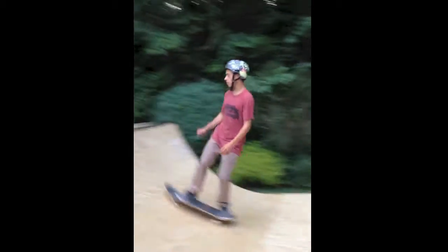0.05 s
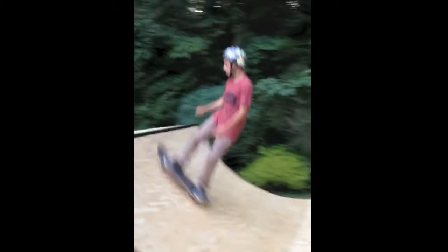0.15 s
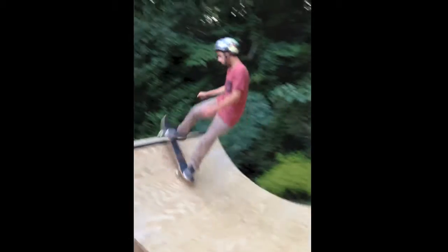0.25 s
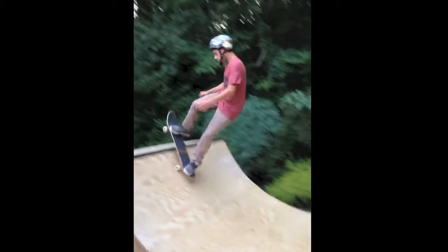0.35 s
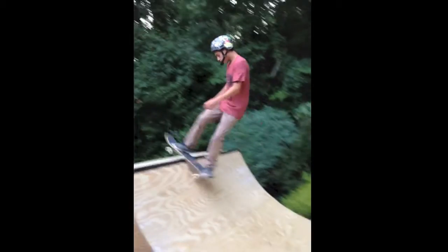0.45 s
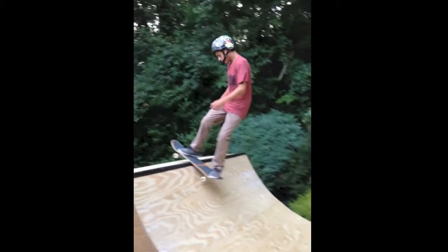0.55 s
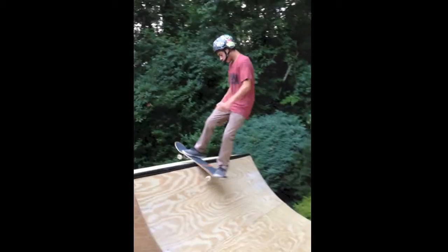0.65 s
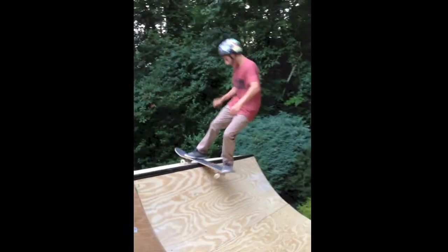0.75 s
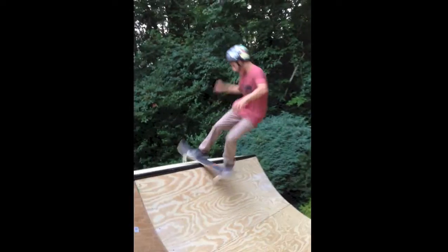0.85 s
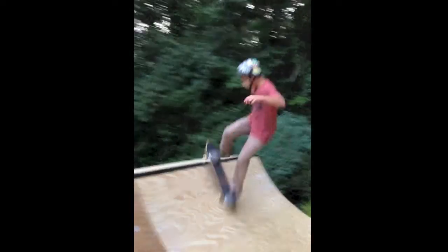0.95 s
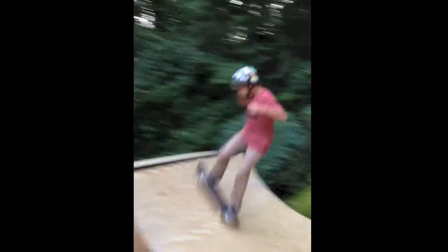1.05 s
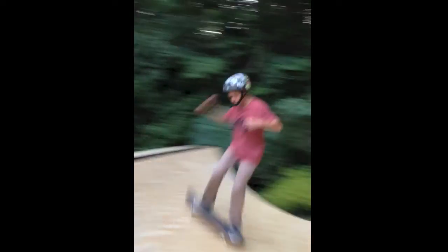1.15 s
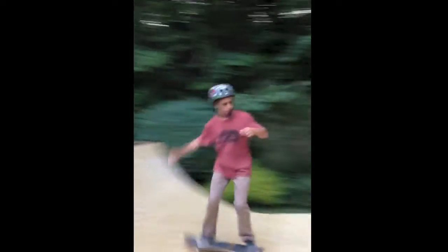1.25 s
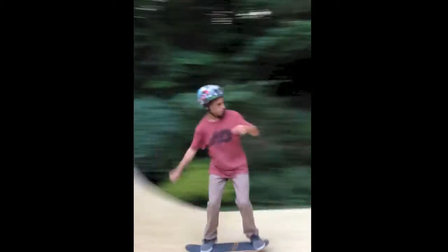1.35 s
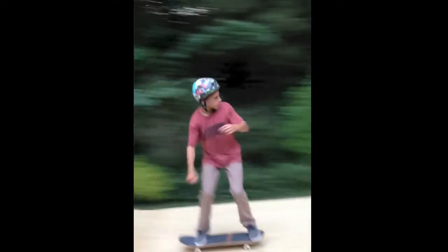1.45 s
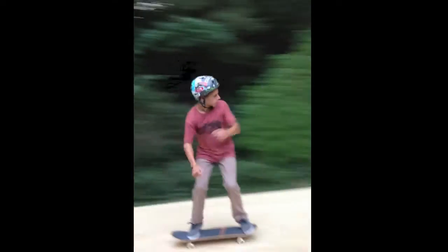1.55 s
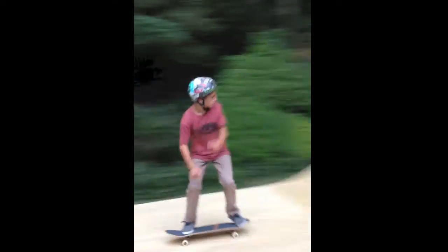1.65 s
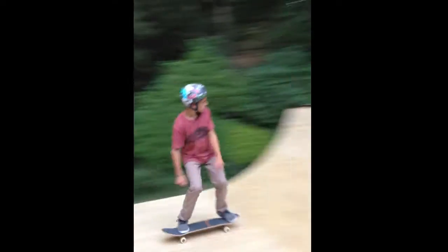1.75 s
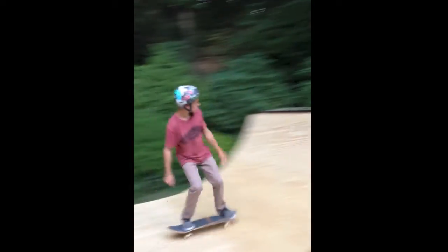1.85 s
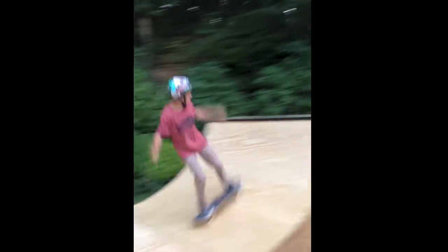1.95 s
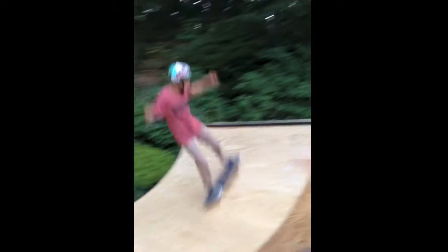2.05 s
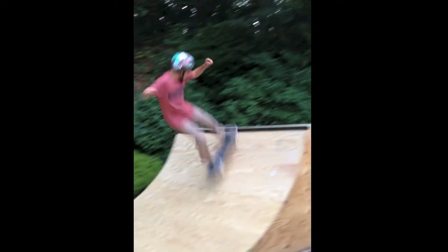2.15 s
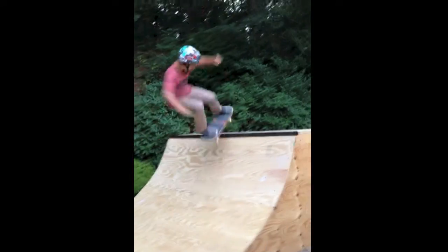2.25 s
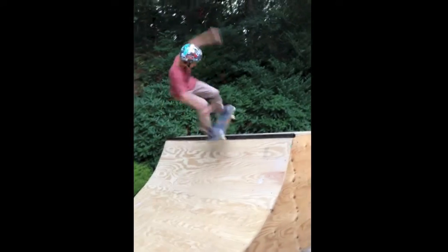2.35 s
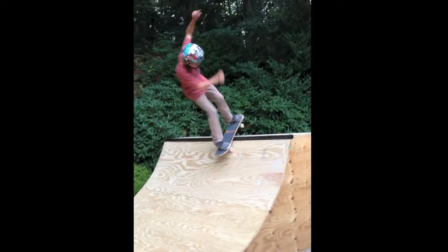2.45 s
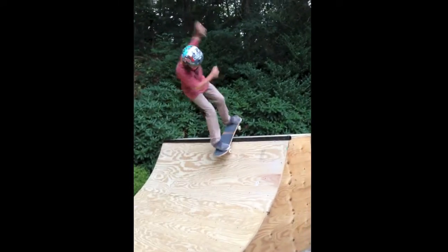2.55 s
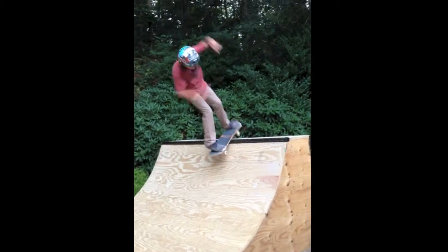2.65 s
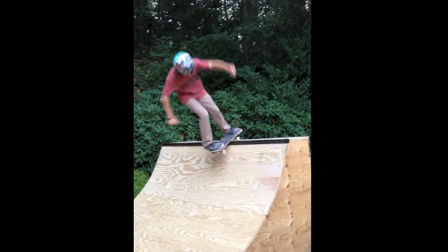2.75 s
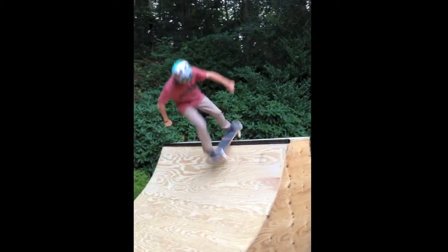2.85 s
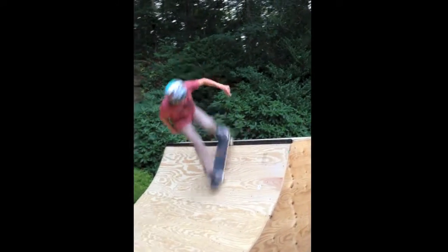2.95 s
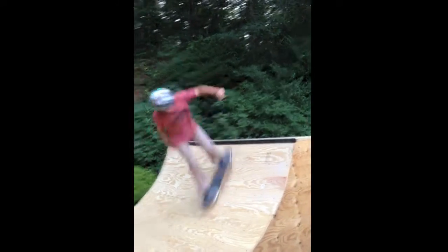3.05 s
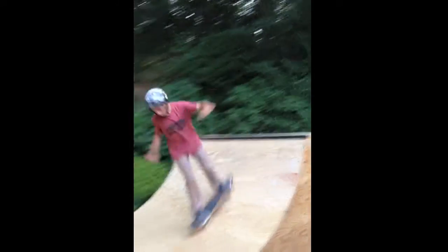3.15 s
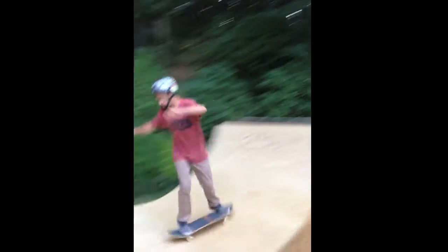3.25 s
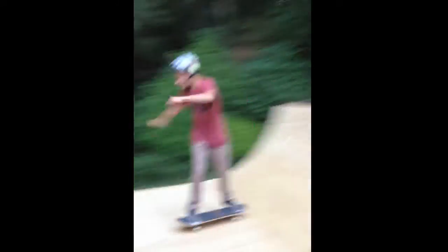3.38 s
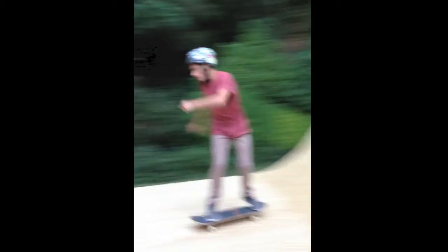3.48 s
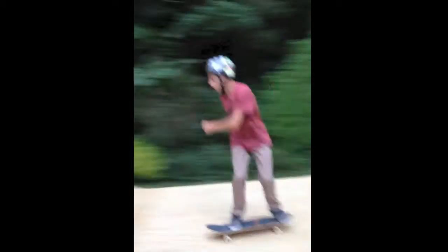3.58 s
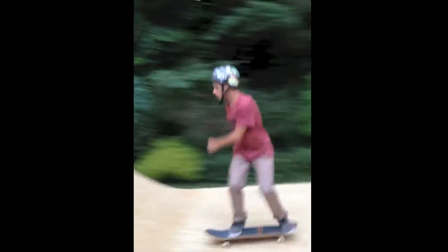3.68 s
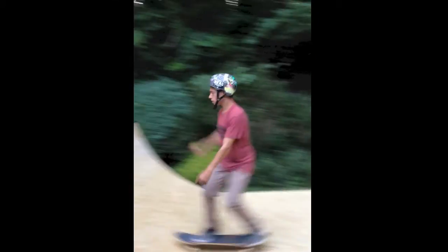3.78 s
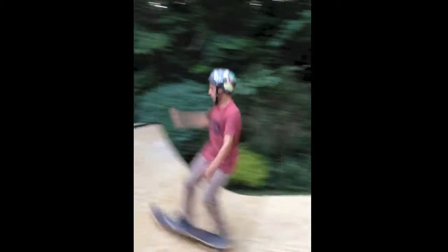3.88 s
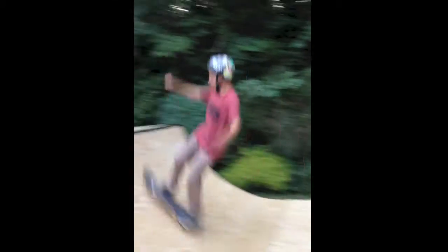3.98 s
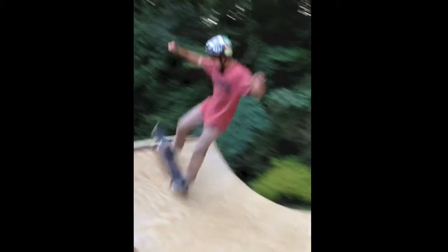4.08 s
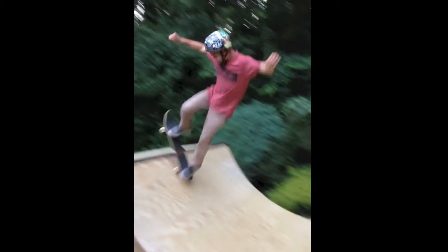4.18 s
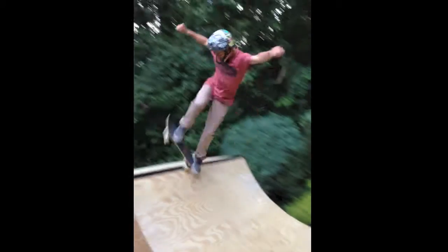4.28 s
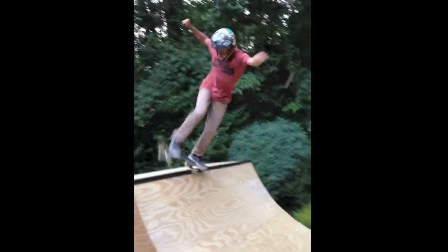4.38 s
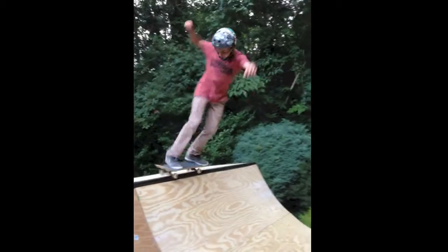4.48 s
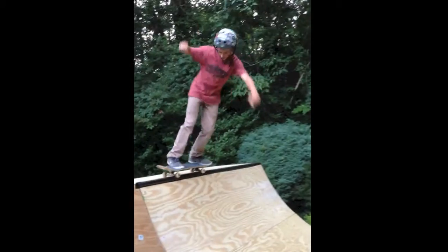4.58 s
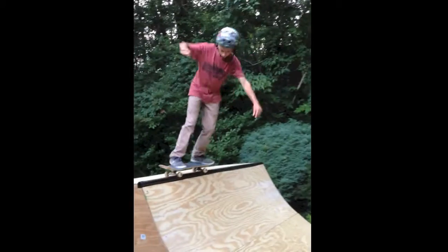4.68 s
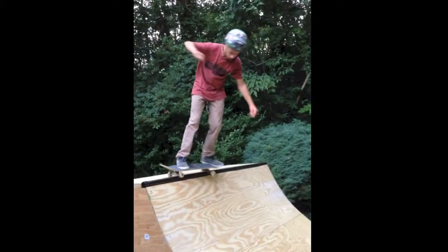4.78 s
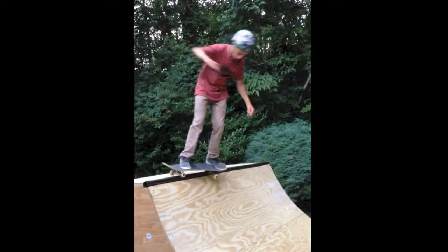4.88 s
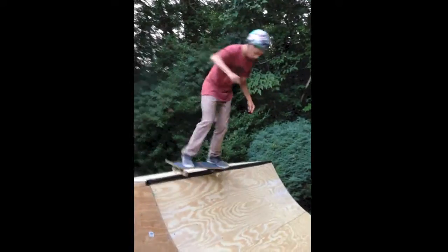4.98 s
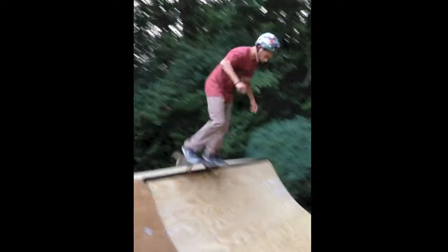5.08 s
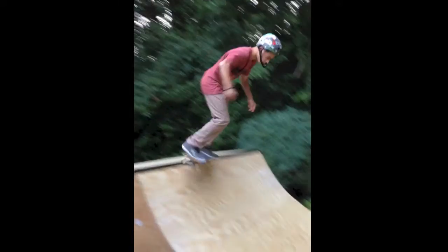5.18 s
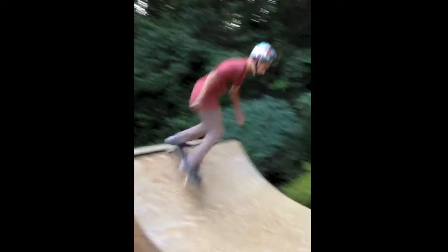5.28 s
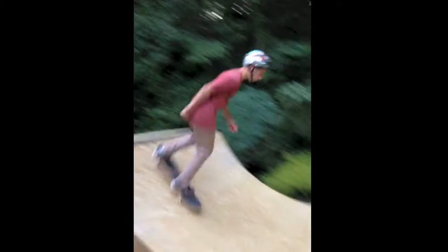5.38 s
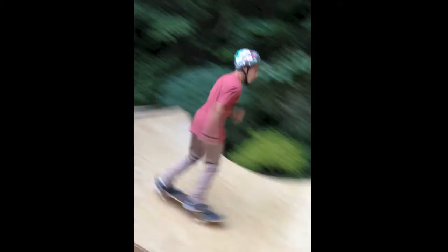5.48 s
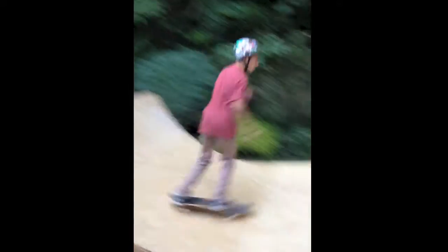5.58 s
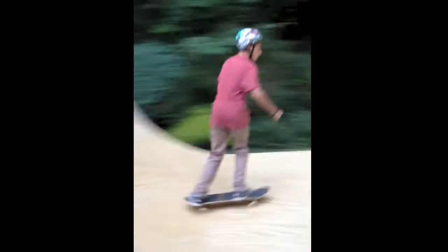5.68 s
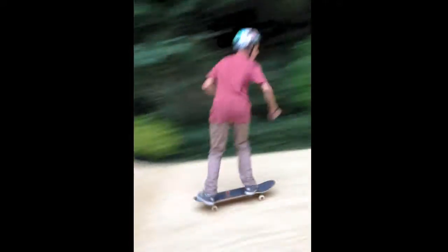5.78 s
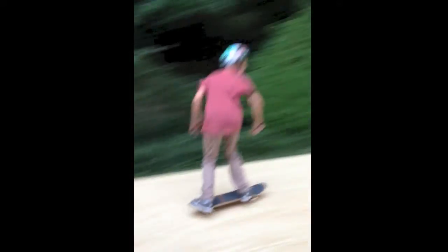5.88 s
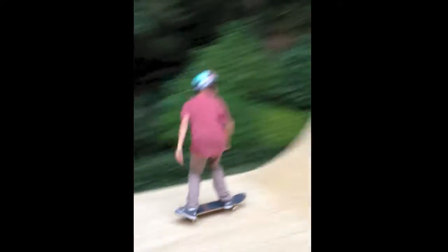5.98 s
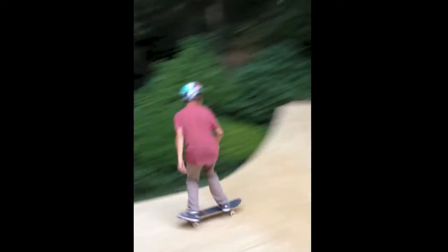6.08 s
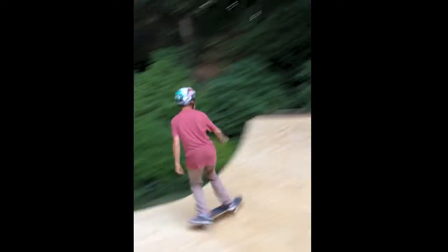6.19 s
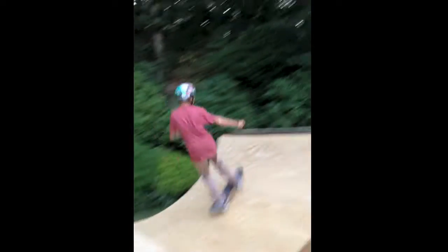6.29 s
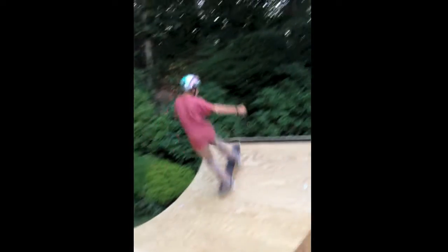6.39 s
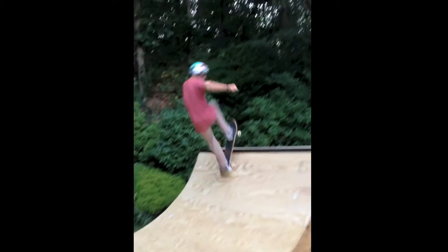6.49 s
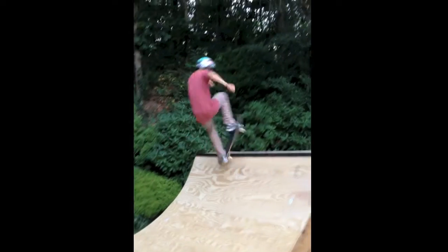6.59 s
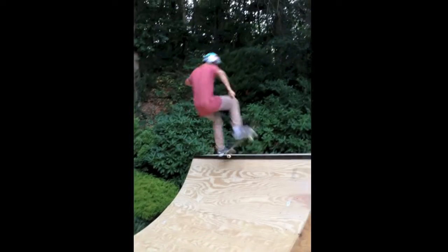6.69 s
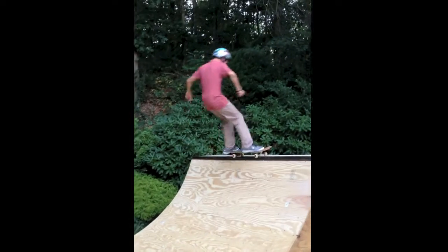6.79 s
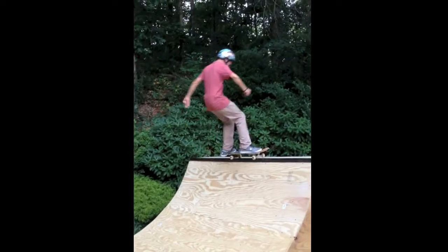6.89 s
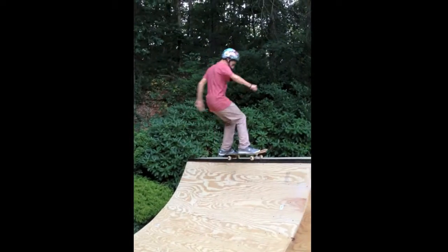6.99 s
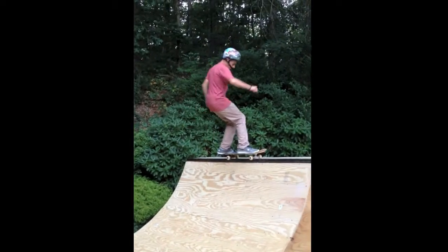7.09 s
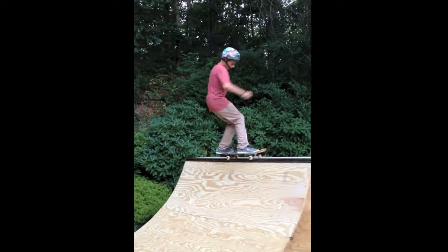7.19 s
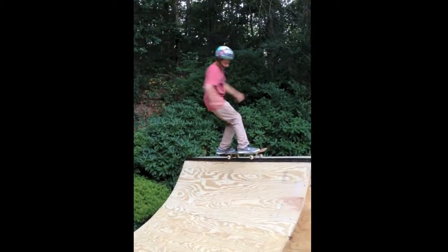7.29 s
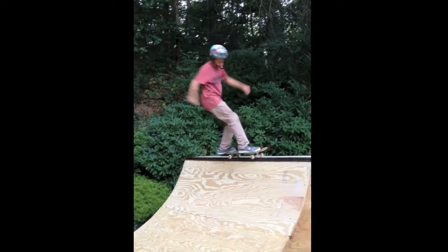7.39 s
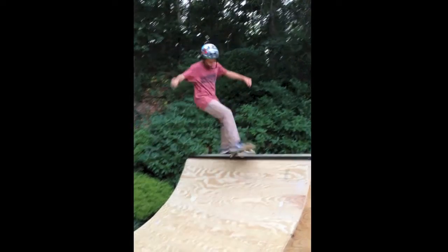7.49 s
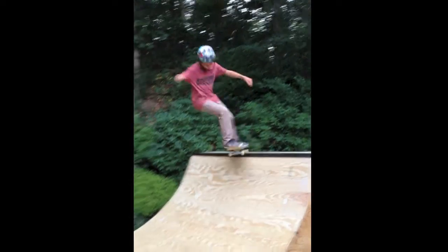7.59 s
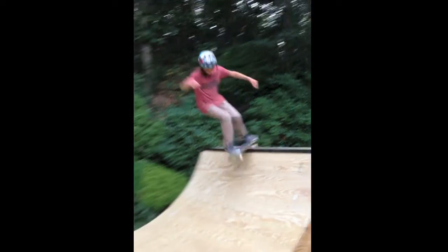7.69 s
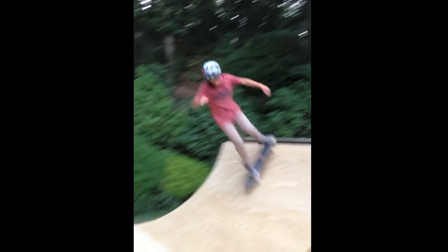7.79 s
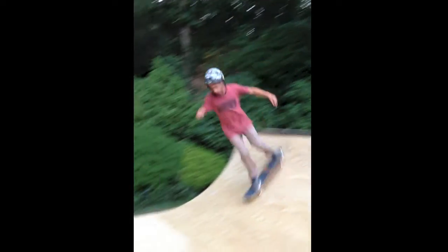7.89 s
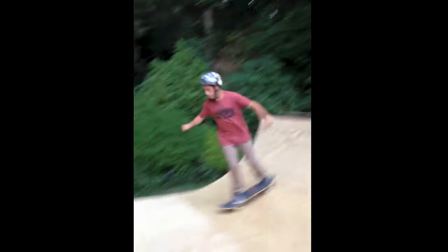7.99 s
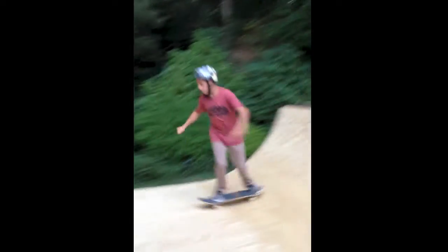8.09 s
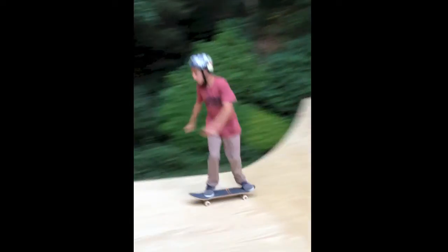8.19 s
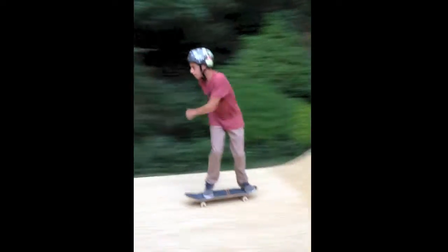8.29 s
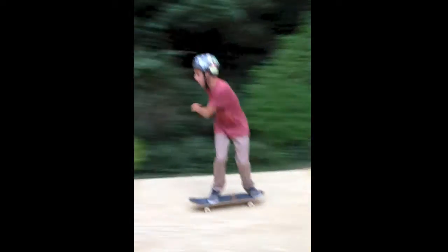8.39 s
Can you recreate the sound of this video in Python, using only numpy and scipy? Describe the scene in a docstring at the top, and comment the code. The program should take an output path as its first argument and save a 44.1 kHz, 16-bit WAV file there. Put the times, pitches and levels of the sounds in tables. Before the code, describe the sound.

A skateboard rolls up a hollow plywood ramp with rumble, roar and hiss, then cracks against the lip and nearly goes silent. It knocks back in, rumbles across the flat and climbs again. Four lip visits follow this pattern, the later two with metallic clanks on steel coping. Quiet backyard air, faint slap echoes, close small microphone with thin deep bass.

```python
"""Skateboard on a wooden mini ramp

A skateboarder rides back and forth on a plywood mini ramp in a quiet backyard. Filtered random bumps
make the hollow ramp rumble, roar and hiss, loudest in the curves. At each lip, short noisy contacts
knock modal deck and ramp resonances or clank the steel coping; the board stalls in near silence and
drops back in. Skids chirp, bearings whirr on the flat, and scattered echoes answer from the yard."""
import sys
import numpy as np
from scipy import signal
from scipy.fft import rfft, irfft
from scipy.io import wavfile

SR = 44100
rng = np.random.default_rng(int(sys.argv[2]) if len(sys.argv) > 2 else 0)


def waveform_to_disk(signal):
    """Save audio, clipped to [-1, 1], as 16-bit WAV at the path in sys.argv[1]."""
    frames = np.transpose(np.atleast_2d(signal))
    scaled = np.clip(frames, -1, 1) * 32767
    samples = np.round(scaled).astype(np.int16)
    wavfile.write(sys.argv[1], SR, samples)


N = 372204

# riding down a curved wall: (start [s], end [s], level [dB], extra rumble [dB])
DESCENT_ROWS = [(1.114, 1.398, 2, 0.5), (3.111, 3.39, 2.5, -0.5), (5.45, 5.74, 1, -0.5),
                (7.87, 8.202, -2, -2)]
# riding up the opposite wall: (start [s], end [s], level [dB], extra rumble [dB])
CLIMB_ROWS = [(0.0, 0.281, 0, -1.5), (1.891, 2.219, 0.5, -2), (3.846, 4.151, 1.5, 2),
              (6.222, 6.513, -2.5, 0.5)]
# crossing the flat bottom: (start [s], end [s], level [dB], extra rumble [dB])
FLAT_ROWS = [(1.405, 1.913, -2.5, 4.5), (3.418, 3.854, 0.5, 1), (5.744, 6.28, 0.5, -0.5),
             (8.222, 8.453, -1.5, -2)]
# trucks striking the steel coping: (time [s], blow level [dB], deck note [Hz], ring level [dB],
# ring length [factor], strength of the clear modes [factor])
CLANK_ROWS = [(4.400, -30, 435, -41, 1, .3), (4.531, -20, 812, -26.5, 0.77, 0.56),
              (6.7898, -21, 915, -26.5, 0.78, .15), (6.842, -25, 548, -42, 0.34, .15),
              (6.8596, -21, 483, -26.5, 0.82, .2), (6.986, -35, 447, -40, 0.74, .2)]
# stiff modes of deck and trucks: (frequency [Hz], level [dB], t60 [s])
CLACK_MODES = [(1556, -2.5, 0.069), (2043, -2, 0.029), (2445, -11, 0.065), (3360, -16, 0.056),
               (3780, -3, 0.018), (4570, -14, 0.071), (5150, -12.5, 0.024)]
# spectrum of the topmost tick of a contact: (frequency [Hz], density [dB per Hz])
TICK_SPECTRUM = [(3500, -39), (6000, -3), (7000, -1), (9000, -1.5), (11500, -5), (13000, -13), (16000, 1)]


def gain_of(db):
    """Decibels to amplitude."""
    return 10 ** (np.asarray(db) / 20)


def evened(x):
    """Scales to rms 1."""
    return x / np.sqrt(np.mean(x ** 2) + 1e-20)


def struck(x, seconds):
    """Scales a blow to rms 1 over its first moments."""
    return x / np.sqrt(np.mean(x[:int(seconds * SR)] ** 2) + 1e-20)


def read(points, hz):
    """Reads a table on a log-frequency axis."""
    f, value = np.transpose(points)
    return np.interp(np.log(hz + 1), np.log(f + 1), value)


def add(mix, start_s, sound):
    """Mixes a sound in at a start time."""
    part = mix[max(0, round(start_s * SR)):][:len(sound)]
    part += sound[:len(part)]


def colour(points, size=4096):
    """Causal (minimum-phase) impulse response with the given spectrum."""
    log_gain = np.log(gain_of(read(points, abs(np.fft.fftfreq(size, 1 / SR)))))
    spectrum = np.exp(np.conj(signal.hilbert(log_gain)))
    return np.fft.ifft(spectrum).real[:size // 2]


def through(x, response):
    """Passes x through an impulse response."""
    return signal.oaconvolve(x, response)[:len(x)]


def wander(rate_hz):
    """Smooth random curve of rms 1, up to about the given rate."""
    f = np.fft.rfftfreq(N, 1 / SR)
    return evened(irfft(rfft(rng.standard_normal(N)) / (1 + (f / rate_hz) ** 4), N))


def ring(modes, t, spread_db=2., detune=.02):
    """Decaying sine modes; strengths and pitches vary as with the place that is struck."""
    hz, db, t60 = np.transpose(modes)[:, :, None]
    strength, shift, side = rng.standard_normal((len(modes), 3)).T[:, :, None]
    waves = np.sign(side) * np.sin(2 * np.pi * hz * (1 + detune * shift) * t)
    level_db = db + spread_db * strength - 60 * t / t60
    return (gain_of(level_db) * waves).sum(0)


def resonate(x, hz, width_hz):
    """A one-pole resonance that follows the curve hz, by shifting it down to 0 Hz and back."""
    turn = np.exp(2j * np.pi * np.cumsum(hz) / SR)
    r = np.exp(-np.pi * width_hz / SR)
    return 2 * (turn * signal.lfilter([1 - r], [1, -r], x / turn)).real


def air():
    """Outdoor wash: coloured noise, slowly wavering, with a faint high band like distant insects."""
    # (frequency [Hz], density [dB per Hz])
    air_spectrum = [(20, -1.5), (60, 0), (130, -2), (250, -8), (500, -13), (1200, -18.5), (2500, -27.5),
                    (4000, -25), (5300, -22), (6800, -31.5), (10000, -31), (16000, -33)]
    level_db = -57 + 1.2 * wander(rate_hz=4)
    return gain_of(level_db) * evened(through(rng.standard_normal(N), colour(air_spectrum)))


def bumps(per_s, spread_db):
    """Tiny random blows of the wood grain against the wheels: sparse impulses of either sign."""
    size = gain_of(spread_db * np.minimum(rng.exponential(1, N), 4)) * rng.choice([-1, 1], N)
    return size * (rng.random(N) < per_s / SR)


def stretch(t, start_s, end_s):
    """Wheels take the weight and lose it: attack, hold and release of rumble, roar and hiss."""
    grip_s = 0.0067
    release_db_per_s = np.array((138.5, 177, 261.5))[:, None]  # rumble, roar, hiss
    release_db = -release_db_per_s * np.maximum(t - end_s, 0)
    return np.clip((t - start_s) / grip_s, 0, 1) * gain_of(release_db)


def wheel_levels(t):
    """Gains of rumble, roar and hiss: curves press the wheels hard into the wood, the flat does not."""
    # creeping and turning on two wheels at the lip: (start [s], end [s], level [dB], extra rumble [dB])
    pivot_rows = [(0.956, 1.07, -2.5, 7), (2.945, 3.08, 1.5, 4.5), (4.19, 4.34, 4, -5),
                  (4.4, 4.66, -15, 11), (4.81, 4.9, -7, -1), (5.34, 5.44, 0.5, 4), (6.79, 6.94, -9, 7.5),
                  (7.7, 7.85, -10.5, -17)]
    # base levels of (rumble, roar, hiss)
    descent_db, climb_db = (-27, -30.5, -37), (-24.5, -25.5, -33.5)
    flat_db, pivot_db = (-34, -39.5, -53), (-39.5, -41, -54)
    coast_db, coast_db_per_s = (-52.5, -63, -52.5), 36.5
    speed_up_db_per_s = 15.5  # a descent grows louder as the board gathers speed
    arch_db = (1, 2.5, 5)  # drop from the middle of a curve to its ends
    parts = (
        (DESCENT_ROWS, descent_db, speed_up_db_per_s, True),
        (CLIMB_ROWS, climb_db, 0, True),
        (FLAT_ROWS, flat_db, 0, False),
        (pivot_rows, pivot_db, 0, False),
    )
    power = np.zeros((3, len(t)))
    for rows, base_db, rise_db_per_s, curved in parts:
        for start_s, end_s, db, rumble_db in rows:
            base = gain_of(np.add(base_db, (rumble_db, 0, 0)))[:, None]
            from_middle_s = np.clip(t, start_s, end_s) - (start_s + end_s) / 2
            place = 2 * from_middle_s / (end_s - start_s)  # -1 to 1
            press_db = rise_db_per_s * from_middle_s - curved * np.outer(arch_db, place ** 2)
            power += (base * gain_of(db + press_db) * stretch(t, start_s, end_s)) ** 2
    # after a climb the ramp settles and the unloaded wheels spin on
    for _, end_s, *_ in CLIMB_ROWS:
        fade = gain_of(-coast_db_per_s * abs(t - end_s)) * (t > end_s)
        power += (gain_of(coast_db)[:, None] * fade) ** 2
    return np.sqrt(power)


def panel_note(t):
    """Plywood panel pitch [Hz]: sinks as the board nears a lip, rises to the braced part on drop-in."""
    # low note at each lip: (time [s], frequency [Hz])
    lip_notes = [(0.5, 96.8), (2.3, 86.6), (2.9, 84.7), (4.4, 102), (6.8, 100)]
    braced_hz, glide_s = 168.4, 0.17
    entered = sum(np.clip((t - start_s) / glide_s, 0, 1) for start_s, *_ in DESCENT_ROWS)
    left = sum(np.clip((t - end_s) / glide_s + 1, 0, 1) for _, end_s, *_ in CLIMB_ROWS)
    lip_hz = np.interp(t, *np.transpose(lip_notes))
    return lip_hz + (braced_hz - lip_hz) * (1 + entered - left)


def rolling():
    """Bumps shake the panel and the deck; grit hisses and rattles; the load on the wheels throbs."""
    # hollow rumble: (frequency [Hz], density [dB per Hz])
    rumble_spectrum = [(20, -35), (45, -25.5), (70, -6.5), (100, -1), (130, 4), (200, 1.5), (270, -1),
                       (350, -2), (500, -30), (900, -66.5)]
    # surface roar: (frequency [Hz], density [dB per Hz])
    roar_spectrum = [(120, -29.5), (250, -8.5), (360, 1), (480, -3), (650, -9), (900, -10), (1250, -16),
                     (1800, -16.5), (3500, -50.5)]
    # wheel hiss: (frequency [Hz], density [dB per Hz])
    hiss_spectrum = [(600, -34), (1200, 3), (1550, 6), (2000, 0), (2550, -5.5), (3300, -3.5), (4200, -7),
                     (5400, -6.5), (6500, -15.5), (8000, -22), (11500, -26), (13000, -41.5), (16000, -43.5)]
    t = np.arange(N) / SR
    coarse_t = t[::64]
    rumble_gain, roar_gain, hiss_gain = (np.interp(t, coarse_t, g) for g in wheel_levels(coarse_t))
    load = wander(rate_hz=12)

    shake = evened(through(bumps(per_s=1500, spread_db=2.5), colour(rumble_spectrum)))
    panel_hz = panel_note(t) * np.exp(0.16 * wander(rate_hz=2.5))
    panel = resonate(bumps(per_s=1500, spread_db=-1.5), panel_hz, width_hz=36)
    panel = evened(resonate(panel, panel_hz, width_hz=370))
    rumble = evened(shake + gain_of(-1.0) * panel)

    # coarse grit sounds in the deck and the wheels at once
    rattle = evened(bumps(per_s=170, spread_db=2.5))
    roar = through(evened(bumps(per_s=2500, spread_db=2.0)) + rattle, colour(roar_spectrum))
    # every patch of plywood under the wheels answers with its own note
    patch_hz = 560 * np.exp(0.38 * wander(rate_hz=28))
    patch = resonate(roar, patch_hz, width_hz=68)
    roar = evened(evened(roar) + 0.76 * evened(patch))

    fine_grit = evened(bumps(per_s=9000, spread_db=0.5))
    hiss = evened(through(fine_grit + 0.45 * rattle, colour(hiss_spectrum)))
    # now and then a grain of sand makes the trucks clack
    grains = bumps(per_s=35, spread_db=3.0)
    sand = through(grains, ring(CLACK_MODES, t[:SR // 10], spread_db=1.0, detune=.02))
    sand_tick = through(grains, colour(TICK_SPECTRUM))
    hiss = evened(hiss + .42 * evened(sand) + .045 * evened(sand_tick))

    return (rumble * rumble_gain * gain_of(2.9 * load)
            + roar * roar_gain * gain_of(0.28 * load)
            + hiss * hiss_gain * gain_of(2.0 * load))


def blows():
    """Yields (time s, thump dB, wood dB, crack dB, tick dB, deck note Hz, contact s), balanced by kind."""
    # deck and wheels slamming down at the lip: (time [s], wood level [dB], ramp thump level [dB],
    # crack level [dB], deck note [Hz], contact time [s])
    slam_rows = [(0.515, -22.5, -29.5, -22, 1105, .002), (0.9554, -17, -23, -26.5, 933, .0045),
                 (1.1, -15, -20.5, -28.5, 518, 0.0059), (2.243, -13.5, -17, -20, 894, 0.0049),
                 (2.4974, -16.5, -16.5, -17.5, 748, .0042), (2.9447, -16, -23.5, -24, 591, 0.005),
                 (3.1078, -15.5, -18.5, -24, 548, 0.006), (4.1723, -22.5, -26, -27.5, 617, 0.002),
                 (5.4402, -12.5, -14.5, -22, 381, 0.0019), (6.5035, -20.5, -18.5, -27, 684, 0.0083),
                 (6.647, -25, -24, -31, 409, 0.0019), (7.8494, -25.5, -23.5, -31.5, 1083, .007),
                 (7.864, -20, -32, -30, 480, 0.0037), (7.8769, -14, -17.5, -19.5, 773, 0.0059)]
    # wheels thudding over joints between the sheets: (time [s], wood level [dB], ramp thump level [dB])
    seam_rows = [(0.036, -21, -26), (0.2345, -23, -18.5), (1.361, -44, -32), (1.448, -33, -26.5),
                 (1.676, -40, -29), (1.9, -34, -23.5), (3.292, -22.5, -20.5), (3.349, -21.5, -15.5),
                 (3.429, -27, -28), (3.8415, -25.5, -18.5), (3.914, -19, -21), (3.976, -26, -32),
                 (4.099, -26.5, -14.5), (6.082, -62, -26), (6.181, -23.5, -28.5), (6.2528, -20.5, -29),
                 (6.434, -27, -25), (8.147, -25.5, -19.5), (8.229, -30, -23.5), (8.394, -32.5, -28.5)]
    # light taps as the rider shifts the board on the lip: (time [s], level [dB], deck note [Hz])
    tap_rows = [(0.8612, -54.5, 910), (2.7729, -44, 795), (2.81, -51, 724), (4.3128, -29, 388),
                (4.622, -33.5, 706), (4.85, -34.5, 1270), (4.864, -28.5, 396), (4.894, -37, 1250),
                (5.106, -55, 565), (5.303, -43, 1280), (5.3388, -37, 1123), (5.3986, -37.5, 780),
                (7.471, -55.5, 1220), (7.5905, -41.5, 1046), (7.661, -47, 890), (7.7148, -38.5, 480),
                (8.339, -36.5, 580)]
    for s, db, thump_db, crack_db, hz, contact_s in slam_rows:
        yield s, thump_db, db, crack_db, crack_db - 12.5, hz, contact_s
    for s, db, thump_db in seam_rows:
        yield s, thump_db, db, db - 11.5, db - 30.5, 429, 0.0078
    for s, db, hz in tap_rows:
        yield s, db - 1, db, db - 5.5, db - 14.5, hz, 0.00735
    for s, db, hz, *_ in CLANK_ROWS:
        yield s, db - 3.5, db, db, db - 8, hz, 0.00569


def boom(blow_s, t):
    """The ramp's frame answers at once; the big panel swings up more slowly and rings on."""
    # hollow ramp's frame: (frequency [Hz], level [dB], t60 [s])
    frame_modes = [(59.6, 3.5, 0.23), (111.3, -13.5, 0.11), (122.8, 8, 0.26), (167, -2.5, 0.06),
                   (201.5, -6.5, 0.25), (221.2, 11.5, .16), (271.6, -6.5, 0.42)]
    panel_hz = panel_note(blow_s)
    panel_t60_s = 36 / panel_hz
    frame = ring(frame_modes, t, spread_db=4.5, detune=0.033) * (1 - np.exp(-t / 0.0013))
    panel = np.sin(2 * np.pi * panel_hz * t) * gain_of(-60 * t / panel_t60_s)
    panel *= 1 - np.exp(-t / 0.0063)
    return struck(frame, 0.026) + 0.44 * struck(panel, 0.076)


def knocks():
    """Each blow is a short noise swell, a hard contact and chatter; deck rings and ramp booms under it."""
    # ramp thump: (frequency [Hz], density [dB per Hz])
    thump_spectrum = [(20, 10.5), (50, -41), (100, 5), (200, 7.5), (300, -12), (500, -30), (1000, -53.5)]
    # wooden knock: (frequency [Hz], density [dB per Hz])
    wood_spectrum = [(130, -54.5), (280, -13), (400, 3), (700, 0), (1100, -3), (1500, -14), (3000, -61.5)]
    # hard crack: (frequency [Hz], density [dB per Hz])
    crack_spectrum = [(700, -48.5), (1250, -5.5), (1600, 5), (2100, 3.5), (2600, -1.5), (3600, 0.5),
                      (5300, -3.5), (6500, -13), (9000, -44)]
    # deck modes: (multiple of its note [factor], level [dB], t60 [s])
    deck_modes = [(.44, -5, .06), (.68, -5, .045), (1, 0, .05), (1.42, -8, .035), (1.85, -9, .04)]
    out = np.zeros(N)
    t = np.arange(int(.45 * SR)) / SR
    low_s, high_s = .04, .015  # levelling windows
    thump_ir, wood_ir = colour(thump_spectrum), colour(wood_spectrum)
    crack_ir, tick_ir = colour(crack_spectrum), colour(TICK_SPECTRUM)
    for s, thump_db, wood_db, crack_db, tick_db, note_hz, contact_s in blows():
        # the rattle spreads through the ramp's frame and dies away
        grip = np.exp(-t / max(contact_s, 1e-3) * 0.97) + 0.1 * np.exp(-t / 0.04)
        chatter = rng.standard_normal(len(t)) * grip * (rng.random(len(t)) < .25)
        force = chatter / np.linalg.norm(chatter)
        force[int(contact_s * SR / 5)] += .4  # the hard contact

        thump = struck(through(force, thump_ir), low_s) + gain_of(-1.5) * struck(boom(s, t), low_s)
        modes = [(k * note_hz, db, t60) for k, db, t60 in deck_modes]
        deck = ring(modes, t, spread_db=1.5, detune=.01) * (1 - np.exp(-t / .0015))
        wood = struck(through(force, wood_ir), high_s) + gain_of(3) * struck(deck, high_s)
        clack = struck(ring(CLACK_MODES, t, spread_db=5.0, detune=0.034), high_s)
        clack *= 1 - np.exp(-t / 0.0023)
        crack = struck(through(force, crack_ir), high_s) + 0.56 * clack
        # metal contacts tick to the very top; urethane ones are duller
        bright_hz = np.clip(14000 * gain_of((tick_db - crack_db + 8) / 3), 6000, 18000)
        tick = signal.lfilter(*signal.butter(2, bright_hz, fs=SR), through(force, tick_ir))
        add(out, s, gain_of(thump_db) * struck(thump, low_s)
            + gain_of(wood_db) * struck(wood, high_s)
            + gain_of(crack_db) * struck(crack, high_s)
            + gain_of(tick_db) * struck(tick, high_s))

        # a short noise swell leads into each blow
        noise = rng.standard_normal(int(.02 * SR))
        lead_in = gain_of(wood_db) * evened(through(noise, wood_ir))
        lead_in += gain_of(crack_db) * evened(through(noise, crack_ir))
        swell = np.exp(-t[:len(noise)][::-1] / .004)
        add(out, s - len(noise) / SR, gain_of(-13) * lead_in * swell)
    return out * gain_of(-0.5)  # common trim of all blows


def skids():
    """A wheel sticks and slips sideways: a rough chirp that swells until the wheel grips."""
    # (start [s], length [s], level [dB], pitch [Hz])
    skid_rows = [(0.496, .012, -44, 2634), (0.509, 0.0075, -21, 2750), (0.938, 0.046, -48, 2500),
                 (3.348, 0.004, -28, 10060), (3.428, 0.0042, -39, 10540), (4.824, 0.086, -41, 1896),
                 (5.435, 0.0086, -35, 2690)]
    out = np.zeros(N)
    for s, length_s, db, hz in skid_rows:
        size = max(int(length_s * SR), 100)
        pitch_hz = hz * (1 + .1 * wander(rate_hz=600)[:size])
        swell = np.linspace(.2, 1, size) * signal.windows.tukey(size, .2)
        chirp = np.sin(2 * np.pi * np.cumsum(pitch_hz) / SR)
        add(out, s, gain_of(db) * evened(swell * chirp))
    return out


def bearings():
    """A narrow, wavering noise whirr that shows on the flat, where the board is fastest."""
    # (frequency [Hz], density [dB per Hz])
    whirr_spectrum = [(2200, -35), (3000, -43), (3300, 2.5), (3600, -40), (5000, -11), (12000, -17)]
    level = np.zeros(N)
    for start_s, end_s, db, _ in FLAT_ROWS:
        fade = signal.windows.tukey(int((end_s - start_s) * SR), .3)
        add(level, start_s, gain_of(-57 + db) * fade)
    waver = gain_of(3.5 * wander(rate_hz=14) - 2.5)
    return level * waver * evened(through(rng.standard_normal(N), colour(whirr_spectrum)))


def coping():
    """The steel pipe rings in a few clear modes over a dense shimmer, damped by the board on it."""
    # (frequency [Hz], level [dB], t60 at ring length 1 [s])
    pipe_modes = [(3170, -30.5, .41), (3770, -11.5, 0.4), (4730, -4, .35), (4830, 0.5, 0.67),
                  (5000, 9, 0.24), (5200, -22.5, .54), (5390, 17.5, 0.057), (5771, -16.5, 0.89),
                  (5600, -7.5, 0.71), (6260, 4, 0.24), (6960, -14, 0.82), (7840, -10.5, 0.41),
                  (7960, -10.5, 0.34), (9000, -6, 0.29), (10200, -19.5, 0.57), (11470, -11, 0.24),
                  (12890, -18, .3), (13500, -21.5, 0.45)]
    out = np.zeros(N)
    t = np.arange(int(.7 * SR)) / SR
    for s, _, _, db, hold, clear in CLANK_ROWS:
        modes = [(hz, mode_db, t60 * hold) for hz, mode_db, t60 in pipe_modes]
        pipe = struck(ring(modes, t, spread_db=1.5, detune=.0005), .05)
        shimmer = sum(ring(modes, t, spread_db=1.5, detune=.06) for _ in range(12))
        shimmer = struck(shimmer, .05) * np.exp(-t / .5)
        add(out, s, gain_of(db) * struck(clear * pipe + shimmer, 0.061))
    return out


def yard(x, size=256):
    """Scattered echoes from ramp walls, house and trees: sparse taps that decay by frequency band."""
    # (frequency [Hz], t60 [s])
    yard_decay = [(60, 0.34), (160, 0.41), (420, 0.3), (1100, 0.44), (3000, 0.41), (7500, 0.62),
                  (15000, 0.3)]
    t = np.arange(SR // 2) / SR
    taps = rng.choice([-1., 1.], len(t)) * (rng.random(len(t)) < 2500 / SR) * (t > .007)
    hz, at_s, bands = signal.stft(taps, SR, nperseg=size)
    decay = gain_of(-60 * at_s / read(yard_decay, hz)[:, None])
    tail = signal.istft(bands * decay, SR, nperseg=size)[1]
    return through(x, tail / np.linalg.norm(tail))


def scene():
    """Wheels, blows and steel in the open yard."""
    dry = rolling() + bearings() + knocks() + coping() + skids()
    return (dry + yard(dry) * gain_of(-17) + air())[None]


def record(dry):
    """The small microphone drops the deepest bass and rounds the loudest peaks; then the band limit."""
    ceiling, low_hz, edge_hz = .9, 38, 15550
    thinned = signal.sosfilt(signal.butter(3, low_hz, "highpass", fs=SR, output="sos"), dry)
    soft = ceiling * np.tanh(thinned / ceiling)
    band_limit = signal.firwin(401, edge_hz, window=("kaiser", 8), fs=SR)
    return signal.oaconvolve(soft, band_limit[None], "same")


dry = scene()
out = record(dry)
waveform_to_disk(out)
```